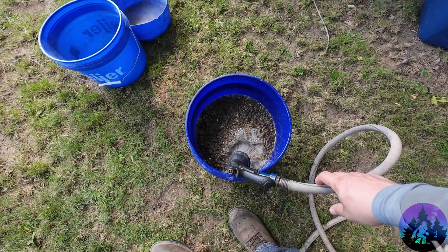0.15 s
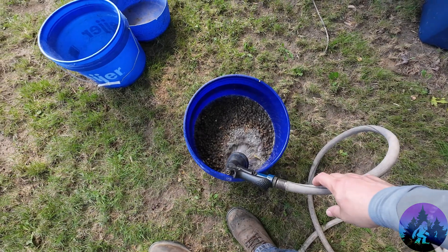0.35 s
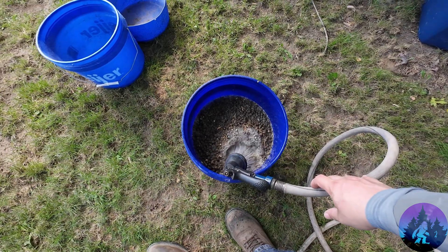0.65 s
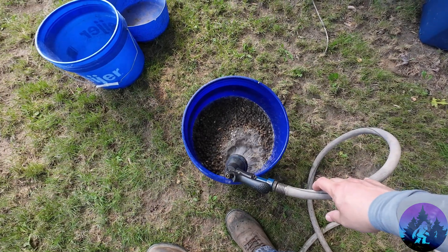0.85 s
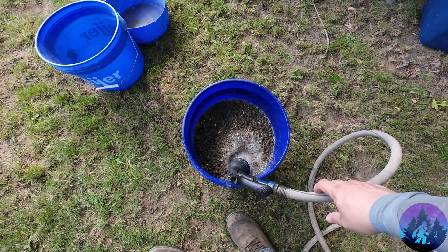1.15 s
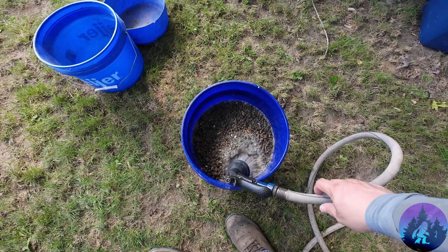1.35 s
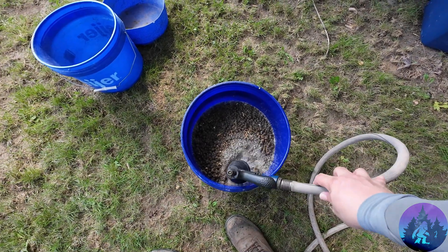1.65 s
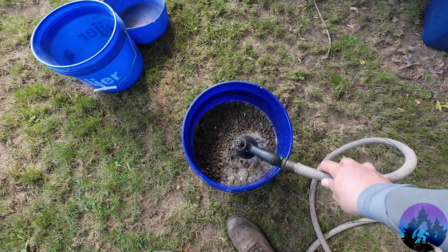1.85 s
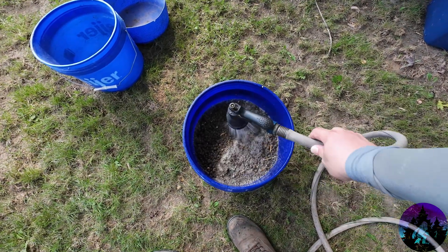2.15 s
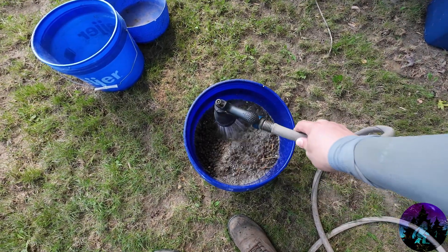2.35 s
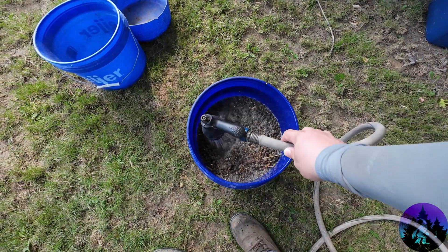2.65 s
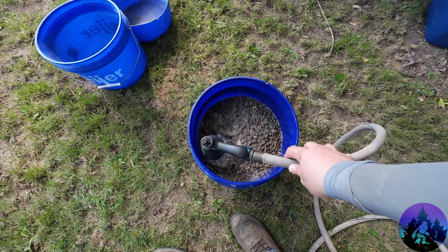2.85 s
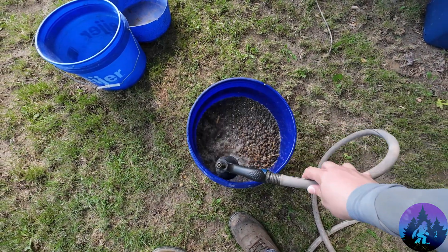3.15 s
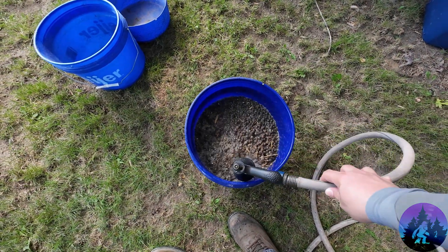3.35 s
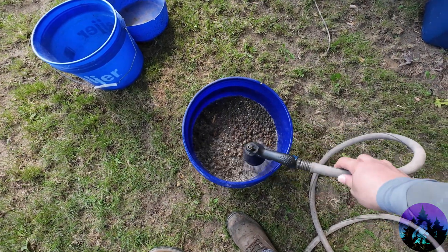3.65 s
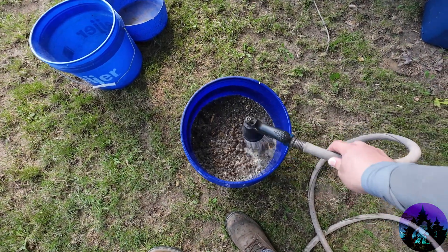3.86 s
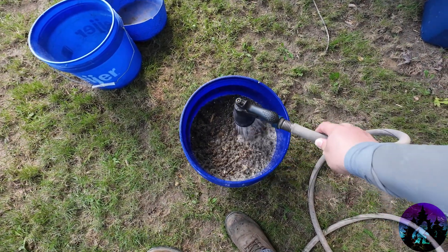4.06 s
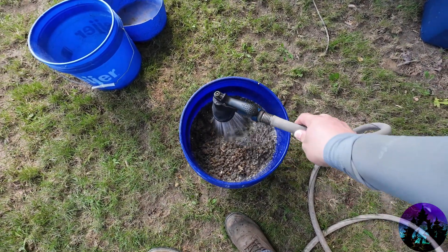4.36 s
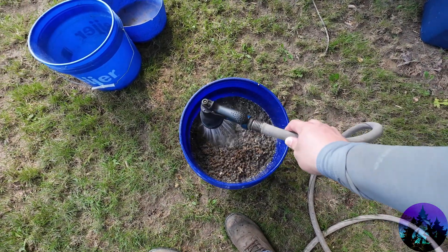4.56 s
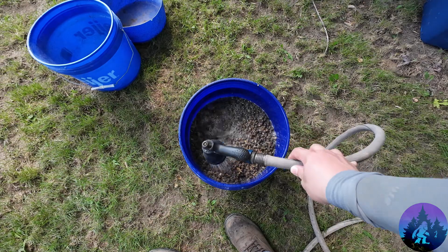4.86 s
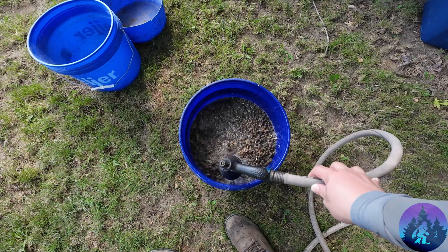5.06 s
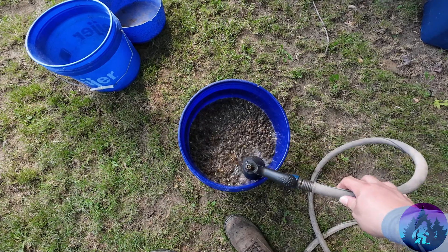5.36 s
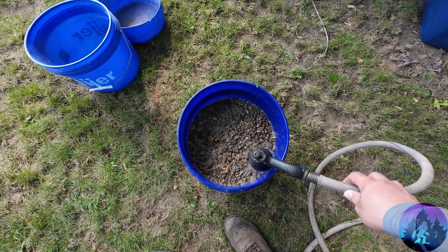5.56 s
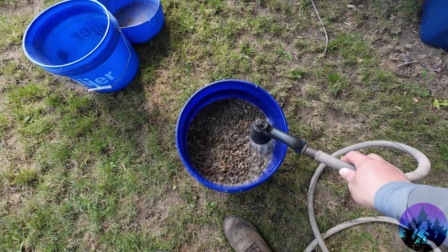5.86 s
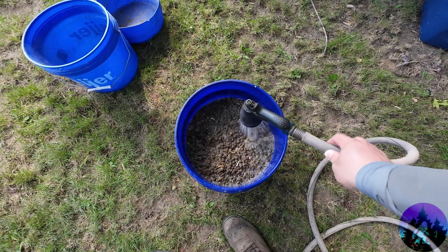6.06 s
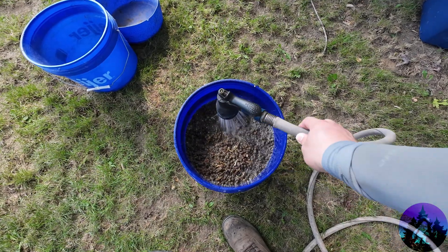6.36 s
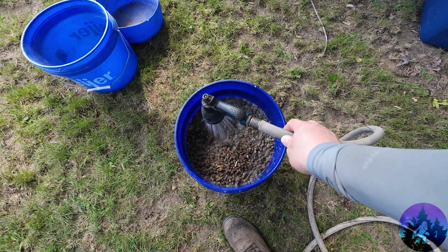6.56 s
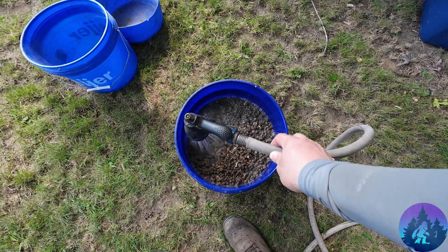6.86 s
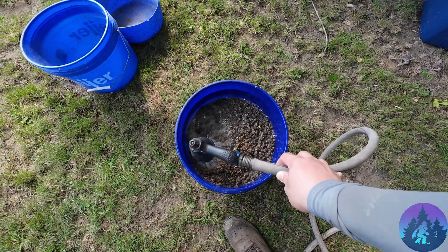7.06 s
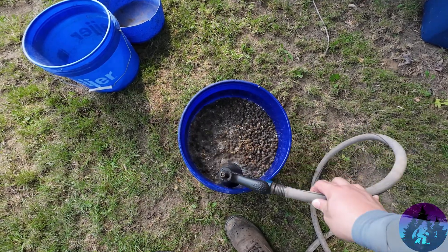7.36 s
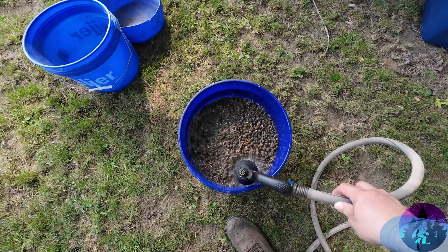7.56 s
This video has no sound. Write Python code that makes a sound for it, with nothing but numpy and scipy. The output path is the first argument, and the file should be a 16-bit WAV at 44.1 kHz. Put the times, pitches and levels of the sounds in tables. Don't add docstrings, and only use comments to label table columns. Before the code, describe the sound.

A hose spray is already running at 0 s and never stops until the end near 7.7 s. Thousands of fine drops make a dense, bright hiss and splash on wet compost, with hollow midrange ringing from the plastic bucket and tiny bubble chirps blended into the froth. Pressure dips softly about every 0.75 s. Until about 1.7 s the nozzle stays near one wall and the tone is fairly steady; then it circles, growing brighter, airier and wider around 2.2, 4.4 and 6.1-6.5 s, and more muffled between, around 3.3 and 5.5 s. Low wind rumbles on each stereo side independently: small gusts from 0.4 to 1.5 s, lighter around 2-3 s, strong buffeting from 4 to 5.8 s with short fluttering slaps mostly on the right, a calmer stretch near 6 s, a right-side slap at 6.75 s, and thumps again around 7.2-7.4 s. Close, dry, outdoors.

```python
import sys
import numpy as np
from scipy import signal
from scipy.fft import rfft, irfft, next_fast_len
from scipy.io import wavfile
from scipy.ndimage import uniform_filter1d

SR = 44100
rng = np.random.default_rng(int(sys.argv[2]) if len(sys.argv) > 2 else 0)


def unload_audio(sound):
    columns = np.transpose(np.atleast_2d(sound))
    steps = np.round(np.clip(columns, -1, 1) * 32767)
    wavfile.write(sys.argv[1], SR, steps.astype(np.int16))


def how_loud(loudness_db):
    steps = np.asarray(loudness_db, float) / 20
    return 10 ** steps


N = 340452
SIZE = next_fast_len(N)
HZ = np.maximum(np.arange(SIZE // 2 + 1) * SR / SIZE, 1)


def rms_one(x):
    return x / np.sqrt(np.mean(x ** 2) + 1e-20)


def in_time(rows):
    s, *columns = np.transpose(rows)
    return [np.interp(np.arange(N) / SR, s, column) for column in columns]


def at_hz(points, hz):
    table_hz, level_db = np.array(points)[:, 0], np.array(points)[:, 1]
    return np.interp(np.log(hz), np.log(table_hz), level_db)


def drift(rate):
    step = 40
    r = np.exp(-2 * np.pi * rate * step / SR)
    noise = rng.standard_normal(N // step + 2002)
    slow = signal.lfilter([1], [1, -2 * r, r * r], noise)[2000:]
    return np.interp(np.arange(N) / step, np.arange(len(slow)), rms_one(slow))


def drops(per_s, spread_db):
    sizes = how_loud(spread_db * np.minimum(rng.exponential(1, N), 4))
    signs = rng.choice([-1, 1], N)
    chance = per_s * how_loud(0.7 * drift(30)) / SR
    return rms_one(sizes * signs * (rng.random(N) < chance))


def bubbles(per_s, low_hz, high_hz, cycles, rise):
    when, pitch, size = rng.random((6000, 3))[:int(per_s * N / SR)].T
    samples = np.arange(700)
    hz = (low_hz * (high_hz / low_hz) ** pitch)[:, None]
    turns = hz * samples / SR
    tones = np.sin(2 * np.pi * turns * (1 + rise * turns))
    rings = tones * np.exp(-turns / cycles) * how_loud(12.3 * size)[:, None]
    out = np.zeros(N + 700)
    np.add.at(out, (when * N).astype(int)[:, None] + samples, rings)
    return rms_one(out[:N])


def spray_levels():
    # t/s, nearness to far wall (0-1), to left wall (0-1),
    # spray in plain view over the rim (0-1)
    nozzle = [(0.0, 0.0, 0.06, 0.31), (0.7, 0, 0.0, 0.45), (1.47, 0.2, 0.0, 0.2), (1.77, 0.1, 0.45, 0.0),
              (2.15, 0.56, 0.5, 0.92), (2.96, 0, 0.9, 0.7), (3.18, 0.26, 0.6, 0.0), (3.7, 0.18, 0.2, 0.2),
              (3.91, 0.5, 1.0, 0.29), (4.35, 0.82, 0, 0.93), (4.77, 0.61, 1.0, 0.8),
              (5.22, 0.05, 0.33, 0.37), (5.51, 0.2, 0.6, 0.0), (6.11, 1.0, 0.44, 0.55),
              (6.49, 0.96, 0.0, 0.89), (7.08, 0.64, 0.87, 0.6), (7.46, 0.5, 0, 0.23),
              (7.72, 0.4, 0.8, 0.06)]
    # t/s, depth/dB
    lulls = [(0.41, 2.5), (1.15, 2.5), (1.97, 3), (2.69, 2), (3.45, 3.5), (4.26, 4), (4.98, 3.3),
             (5.74, 2.5), (6.48, 3.5), (7.31, 4.5)]
    # level/dB, share of a lull (ratio),
    # change at far wall/dB, at left wall/dB, in plain view/dB
    zones = [
        (-36.5, 1.55, -2, -4.5, -1.1),
        (-45, 1.15, 4, -2.5, -0.7),
        (-44.5, 1.6, 6, -4, 5),
        (-36.0, 1.15, -0.1, -4, -2.5),
        (-39.5, 1.5, 1.5, -3.5, 0.3),
        (-34.5, 1.23, 3, 0.0, 1.6),
        (-30.5, 0.67, 0.84, -0.5, 2.5),
        (-33.5, 1.07, 1.56, -1.1, 4.5),
        (-35.1, 1.16, 1.2, -2.0, 4),
        (-27.5, 1.06, 1.2, -1.3, 5.5),
    ]
    t = np.arange(0, N + 64, 64) / SR
    place = np.array(in_time(nozzle))
    sag_db = np.zeros(len(t))
    for s, depth_db in lulls:
        from_centre = np.clip((t - s) / 0.3, -1, 1)
        sag_db += depth_db * np.cos(np.pi / 2 * from_centre) ** 2
    sag_db = np.interp(np.arange(N) / SR, t, sag_db)
    levels_db = [base_db - share * sag_db + np.dot(place_db, place) for base_db, share, *place_db in zones]
    width_db = -2 + np.dot([1.5, 2, 2], place)
    return levels_db, width_db


def narrow_bands(pair, low, high, patchy_db, patch_rate):
    edges = np.linspace(low, high, 2 + int((high - low) / 1400))
    zone = 0
    for a, b in zip(edges, edges[1:]):
        inside = np.minimum((HZ - a) / a, (b - HZ) / b) / 0.06
        mask = np.sin(np.pi / 2 * np.clip(inside + 0.5, 0, 1)) ** 2
        zone = zone + irfft(pair * mask, SIZE)[:, :N] * how_loud(patchy_db * drift(patch_rate))
    return zone / np.std(zone[0])


def water(patchy_db, patch_rate, flicker_db):
    zone_edges = [90, 560, 750, 1000, 1450, 1800, 2600, 4300, 6600, 8600, 16100]
    # f/Hz, in-phase share (ratio),
    # quarter-turn share (ratio)
    port_skew = [(4000, 0.038, 0), (4800, 0.078, 0.085), (5700, 0.11, .17), (6900, 0.012, .05),
                 (7900, .04, .1), (8500, 0, .04), (9100, .05, .07), (10000, -0.1, .01),
                 (11800, -0.18, -.04), (13600, -0.051, .02), (15300, -.04, -.06)]
    # f/Hz, level against shared sound/dB
    side_share = [(200, -34), (600, -13), (1100, -24), (2400, -23), (3500, -13.5), (4600, -12), (5700, -10),
                  (6500, -11), (7000, -10), (7900, -12), (8500, -10), (9200, -9.5), (11200, -7.5),
                  (12550, -13), (13300, -9)]
    # f/Hz, level per Hz/dB
    low_skirt = [(90, -30), (160, -23)]
    # f/Hz, level per Hz/dB
    near_wall = [(215, -8.5), (300, -6), (390, 0.5), (560, -10.5), (690, -7), (820, -17.5), (860, -19.5),
                 (1080, -5), (1250, -4), (1420, -8.5), (1680, -3), (1890, -13), (2200, -5.5), (2580, -5.5)]
    # f/Hz, level per Hz/dB
    far_wall = [(215, -13), (300, -12), (390, -5), (560, -13.5), (780, -3), (860, 0), (950, -5),
                (1030, -8.5), (1120, -8.5), (1290, -3.5), (1510, -8), (2110, 6.5), (2410, 1.5), (2580, 5.5)]
    # f/Hz, level per Hz/dB
    splash = [(2630, -1.5), (2930, 0.5), (3190, -2), (3490, 1), (4130, -2.5), (4440, -4.5), (4740, -3.5),
              (5560, -5), (5900, -4.5), (6420, -4.5)]
    # f/Hz, level per Hz/dB
    port = [(6720, -7.5), (7150, -10.5), (8010, -5.5), (8610, -10), (8960, -6), (10160, -4.5),
            (11020, -8.5), (12320, -12), (12580, -10.5), (13090, -.5), (13440, .5), (14300, -2.8),
            (15000, -6), (15750, -10)]

    zone_db, width_db = spray_levels()
    far = np.clip((zone_db[2] - zone_db[3] + 7.0) / 7, 0, 1)
    froth = bubbles(500, 909, 4970, cycles=3.5, rise=0.0051)
    direct = rfft(drops(21000, spread_db=2.5) + how_loud(-16) * froth, SIZE)
    skew_hz, in_phase, quarter = np.transpose(port_skew)
    skew = np.interp(HZ, skew_hz, in_phase) + 1j * np.interp(HZ, skew_hz, quarter)
    scattered = how_loud(at_hz(side_share, HZ)) * rfft(drops(21000, spread_db=3.0), SIZE)
    pair = np.array([direct, scattered + skew * direct]) * (HZ < 15760)
    at_near = pair * how_loud(at_hz(low_skirt + near_wall + splash + port, HZ))
    at_far = pair * how_loud(at_hz(low_skirt + far_wall + splash + port, HZ))

    both = 0
    for low, high, level_db in zip(zone_edges, zone_edges[1:], zone_db):
        zone = narrow_bands(at_near, low, high, patchy_db, patch_rate)
        if high <= 2600:
            zone = (1 - far) * zone + far * narrow_bands(at_far, low, high, patchy_db, patch_rate)
        both = both + zone * how_loud(level_db)
    both = both * how_loud(flicker_db * drift(4.9))
    side = both[1] * how_loud(width_db - 3.0)
    return both[0] + np.outer([1, -1], side)


def gust_levels(gusts):
    t = np.arange(0, N + 128, 128) / SR
    s, peak_db, fall_ms, flutter_db = np.transpose(gusts)[:, :, None]
    rumble_db = peak_db - 20000 * np.abs(t - s) / np.maximum(fall_ms, 20)
    levels = []
    for db in (rumble_db, 1.223 * rumble_db + flutter_db):
        total = np.sqrt(np.sum(how_loud(db) ** 2, axis=0))
        levels.append(np.interp(np.arange(N) / SR, t, total))
    return levels


def eddies(colour, even_s, lumpy_db):
    spectrum = rfft(rng.standard_normal(N), SIZE) * how_loud(at_hz(colour, HZ)) * (HZ > 12)
    x = irfft(spectrum, SIZE)[:N]
    swell = np.sqrt(uniform_filter1d(x ** 2, max(int(even_s * SR), 1)))
    return rms_one(x / swell * how_loud(lumpy_db * drift(40)))


def wind(gusts):
    # f/Hz, level per Hz/dB
    rumble_colour = [(15, -13), (25, 5.5), (45, 5.5), (75, 4), (100, -7.5), (140, -54)]
    # f/Hz, level per Hz/dB
    flutter_colour = [(70, -29), (100, -1.5), (130, 2.5), (170, -6), (240, -12), (350, -22.5), (600, -56)]
    rumble, flutter = gust_levels(gusts)
    rumble = np.hypot(rumble * how_loud(4.0), how_loud(-56))
    flutter = np.hypot(flutter * how_loud(2.5), how_loud(-63))
    low = rumble * eddies(rumble_colour, 0.031, lumpy_db=3.5)
    return low + flutter * eddies(flutter_colour, 0.0167, lumpy_db=3.0)


def slaps(length_s):
    # t/s, peak level/dB, f/Hz, left minus right/dB
    bursts = [
        (4.155, -25, 240, -16.5),
        (4.486, -26, 203, -7.0),
        (4.856, -24, 191, -13.0),
        (5.126, -28, 218, 11.5),
        (5.738, -34, 343, 8.0),
        (6.747, -30, 240, -10.0),
        (7.415, -31.5, 256, 0.0),
    ]
    out = np.zeros((2, N))
    t = np.arange(int(length_s * SR)) / SR
    swell = np.sin(np.pi * t / length_s) ** 2
    for s, peak_db, hz, pan_db in bursts:
        cycles = np.sin(2 * np.pi * hz * t * (1.3 - 12 * t)) * swell
        start = round(s * SR)
        out[int(pan_db < 2), start:start + len(t)] += how_loud(peak_db + 6.0) * cycles
    return out


def scene():
    # t/s, peak level/dB, time to rise or fall by 20 dB/ms, flutter level/dB
    left_gusts = [(0.546, -34.5, 170, -13), (0.956, -31, 32, -10), (1.097, -29.5, 144, -19),
                  (1.382, -35, 128, -16), (1.455, -24, 24, -8), (2.368, -44.5, 640, -25),
                  (2.893, -39, 32, -25), (2.99, -39.5, 288, -16), (3.815, -42, 630, -25),
                  (3.972, -27, 64, -10), (4.161, -27, 88, -5), (4.249, -27, 72, -16), (4.413, -31, 390, 0),
                  (4.609, -35, 360, 1), (4.642, -21, 96, -10), (4.723, -21, 56, -11), (4.864, -20, 64, -7),
                  (4.997, -20.5, 147, -3), (5.145, -23, 51, -18), (5.303, -21.5, 150, -5.5),
                  (5.675, -26, 270, -17), (5.755, -29, 80, 3), (6.113, -39, 56, -25), (6.633, -35, 99, -25),
                  (7.043, -34, 89, -25), (7.202, -42, 700, -25), (7.211, -17, 25, -25),
                  (7.301, -22, 43, -17), (7.381, -29, 77, -32), (7.529, -36, 150, -25)]
    # t/s, peak level/dB, time to rise or fall by 20 dB/ms, flutter level/dB
    right_gusts = [(0.447, -28.5, 56, -4), (0.558, -32, 56, -1), (1.111, -27, 160, 0.5),
                   (1.385, -37, 144, 2), (1.904, -32, 64, -25), (2.054, -28, 64, -10),
                   (2.11, -45, 644, -25), (2.211, -32, 40, -8), (2.801, -42.5, 640, -25),
                   (2.877, -29, 40, -25), (3.102, -36, 120, -23), (3.543, -35, 88, -10),
                   (3.954, -22.5, 104, -7.5), (4.146, -26.5, 64, 3.5), (4.16, -33, 552, -12),
                   (4.482, -18, 40, -0.5), (4.663, -16, 32, -10), (4.744, -18, 112, 1), (4.88, -18, 88, 2),
                   (4.994, -28.5, 56, 3), (5.282, -35, 360, -12), (5.349, -21, 96, -4),
                   (5.543, -31.5, 88, 1), (5.703, -27, 80, -1), (5.921, -38, 445, -2),
                   (6.588, -31, 160, -6), (6.745, -24, 64, 0), (7.117, -29.5, 128, -12),
                   (7.383, -20.5, 56, -3), (7.558, -38, 128, -25)]
    spray = water(patchy_db=0.78, patch_rate=9.2, flicker_db=0.01)
    gusts = np.array([wind(left_gusts), wind(right_gusts)])
    return spray + gusts + slaps(length_s=0.021)


def band_limit(x):
    return signal.sosfilt(signal.butter(12, 15790, fs=SR, output="sos"), x)


def record(dry):
    return band_limit(dry)


dry = scene()
out = record(dry)
unload_audio(out)
```